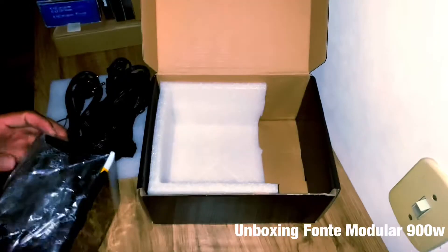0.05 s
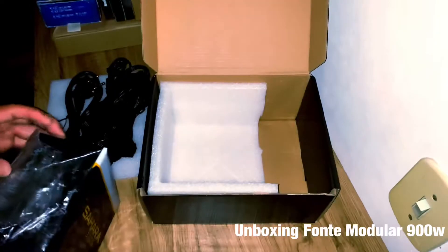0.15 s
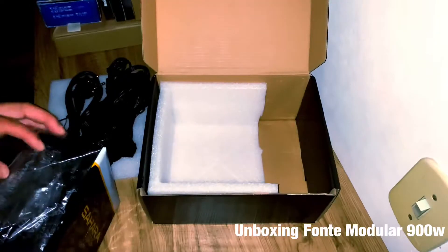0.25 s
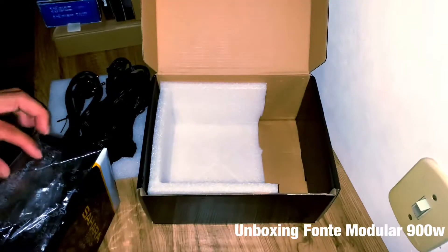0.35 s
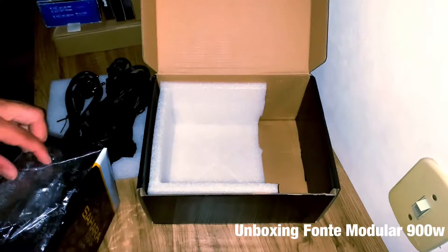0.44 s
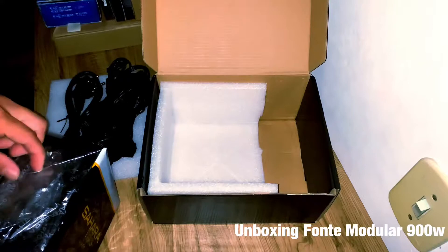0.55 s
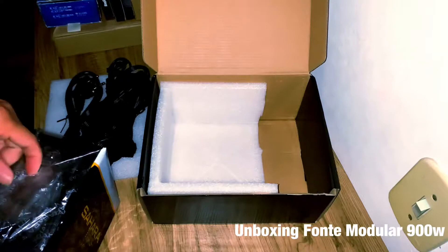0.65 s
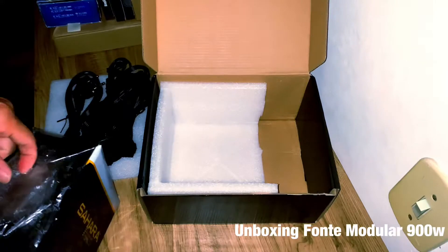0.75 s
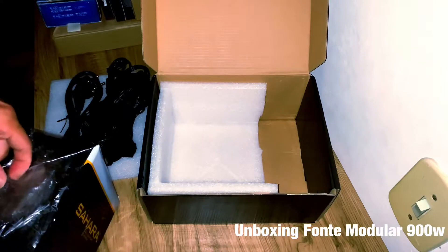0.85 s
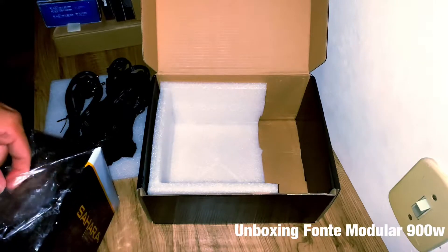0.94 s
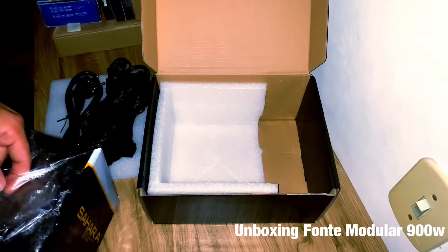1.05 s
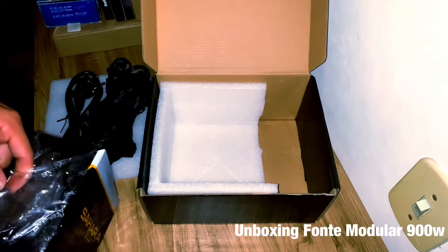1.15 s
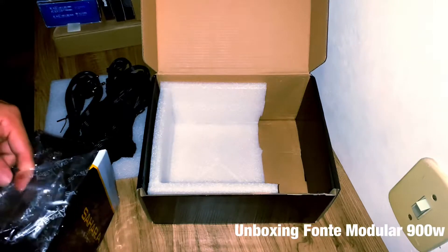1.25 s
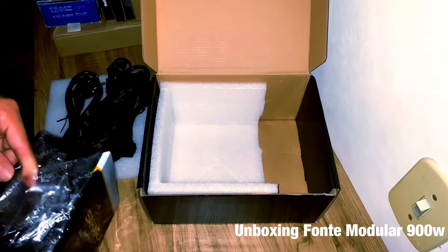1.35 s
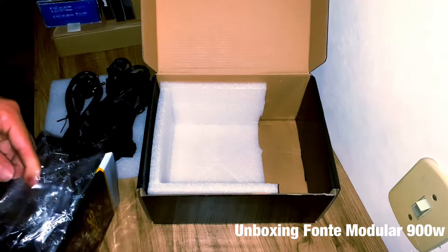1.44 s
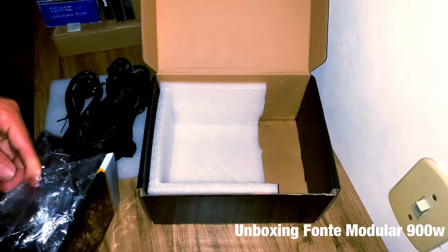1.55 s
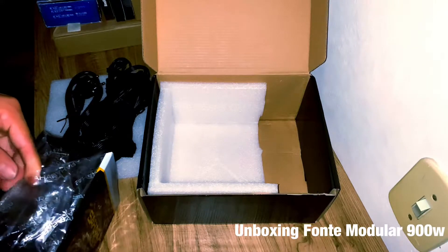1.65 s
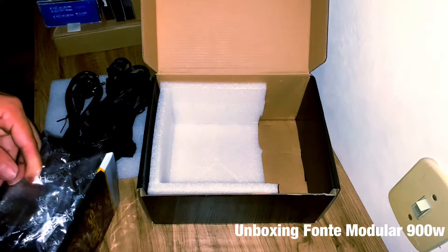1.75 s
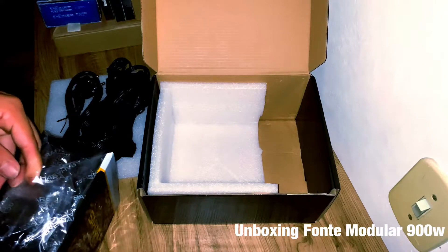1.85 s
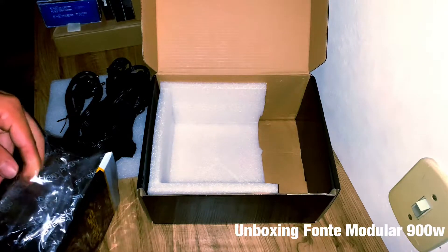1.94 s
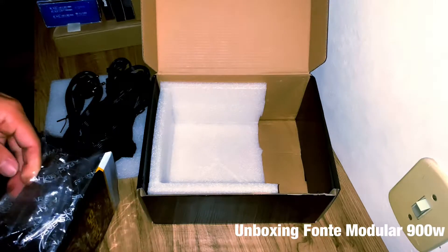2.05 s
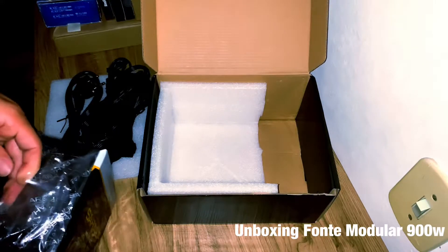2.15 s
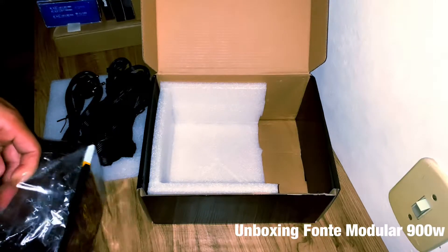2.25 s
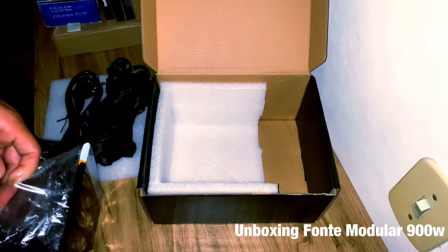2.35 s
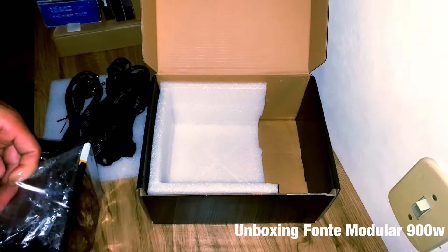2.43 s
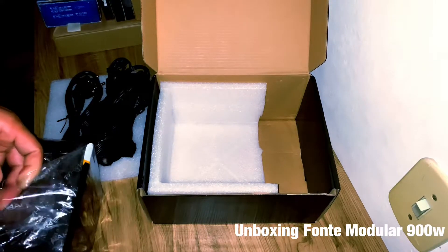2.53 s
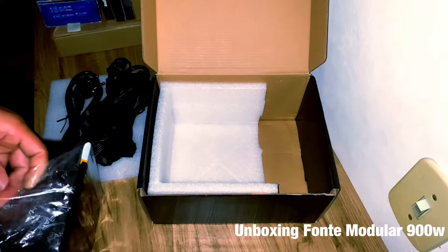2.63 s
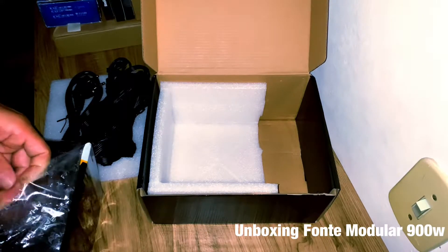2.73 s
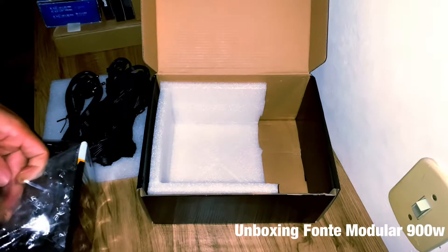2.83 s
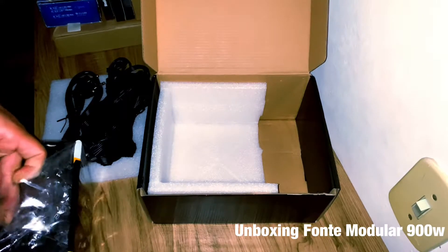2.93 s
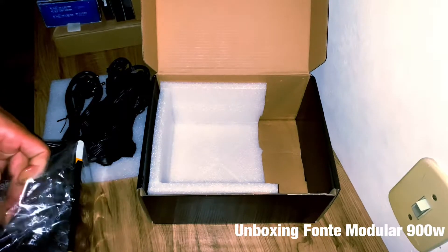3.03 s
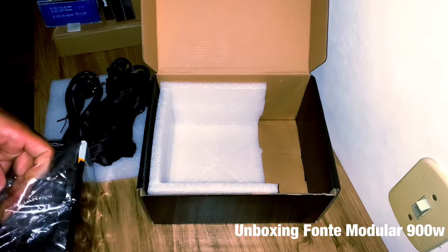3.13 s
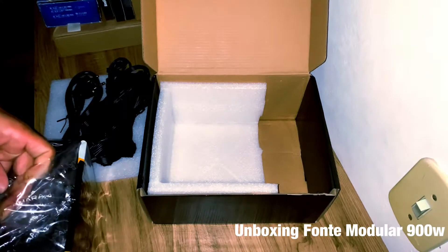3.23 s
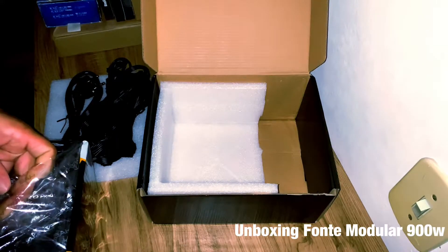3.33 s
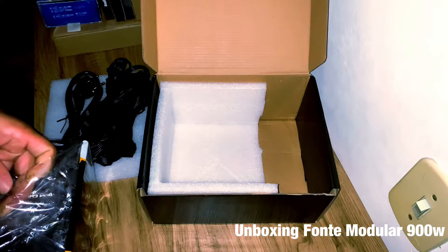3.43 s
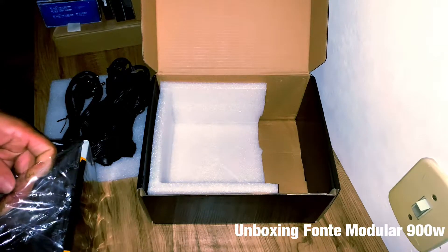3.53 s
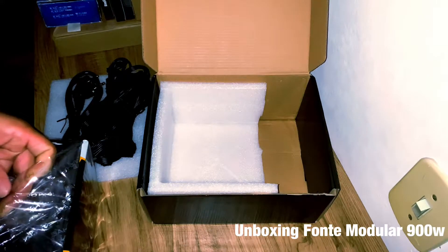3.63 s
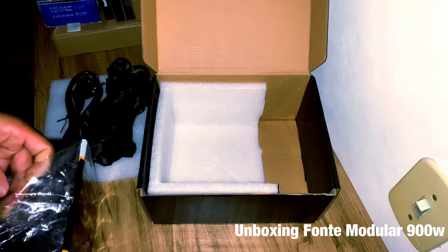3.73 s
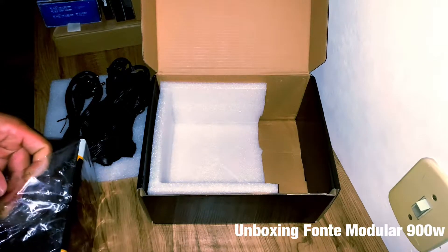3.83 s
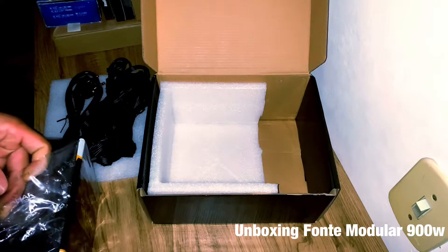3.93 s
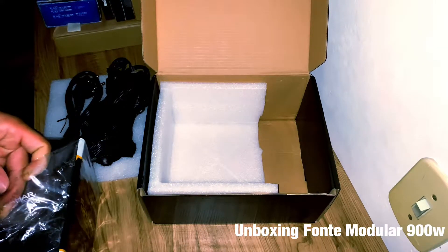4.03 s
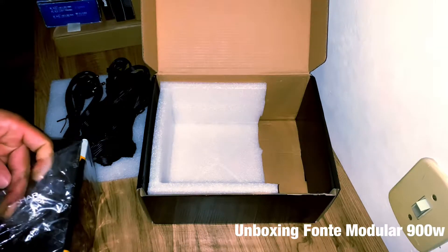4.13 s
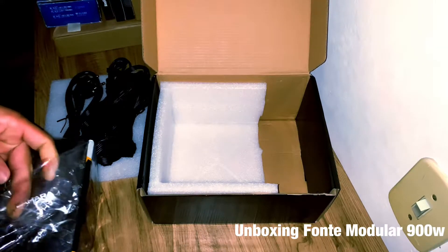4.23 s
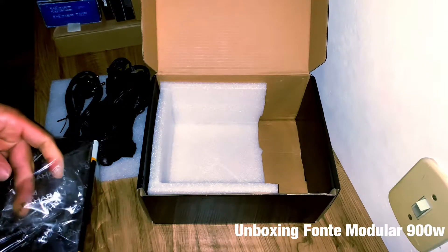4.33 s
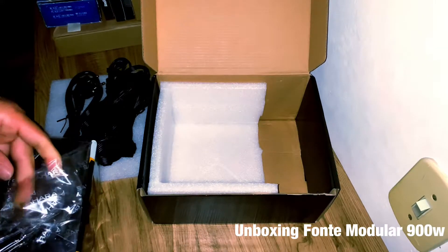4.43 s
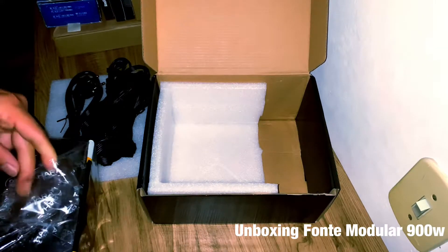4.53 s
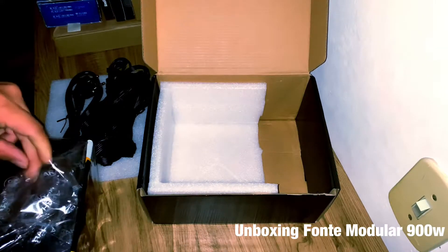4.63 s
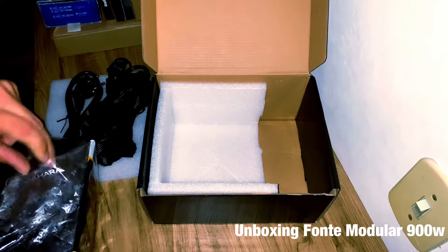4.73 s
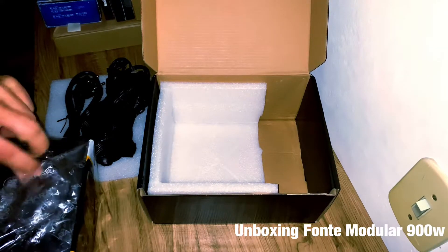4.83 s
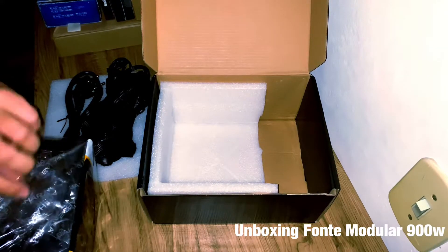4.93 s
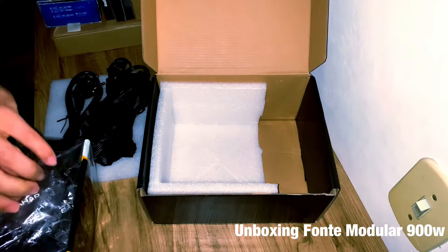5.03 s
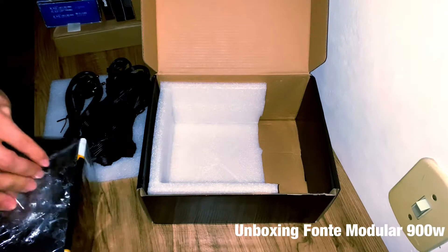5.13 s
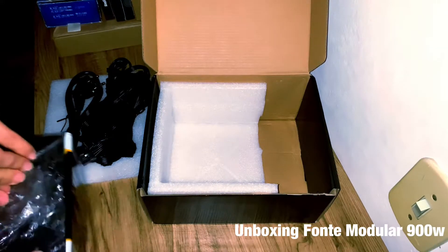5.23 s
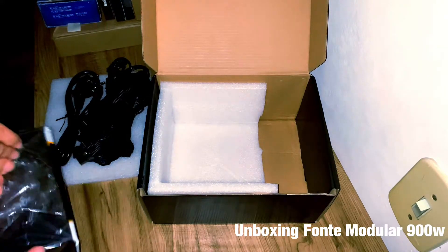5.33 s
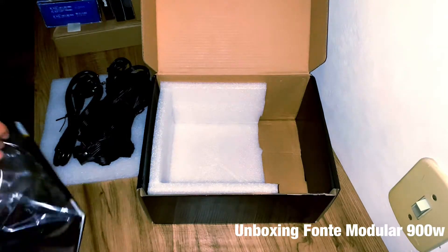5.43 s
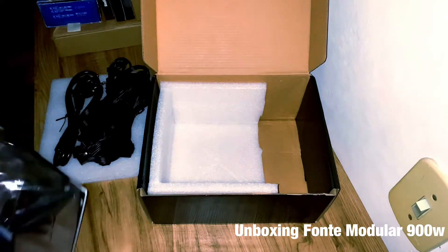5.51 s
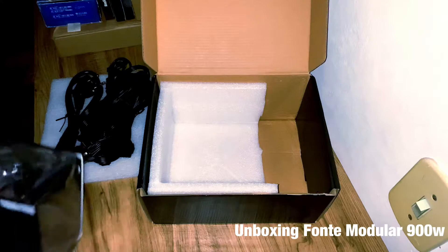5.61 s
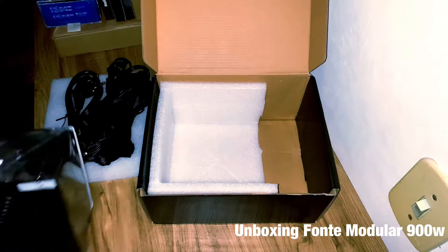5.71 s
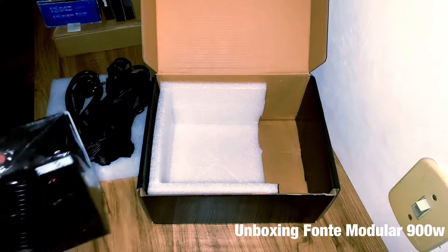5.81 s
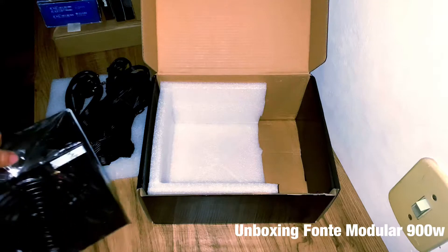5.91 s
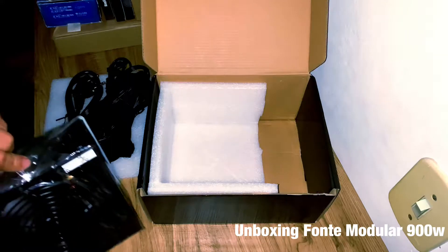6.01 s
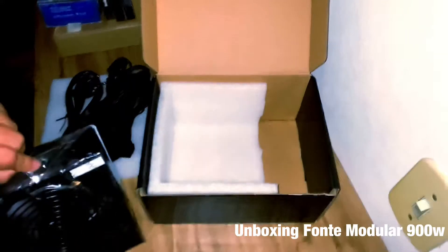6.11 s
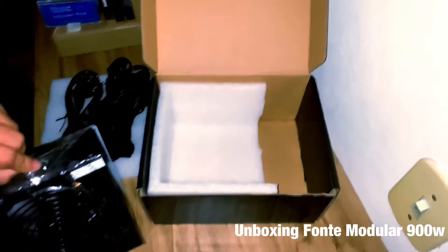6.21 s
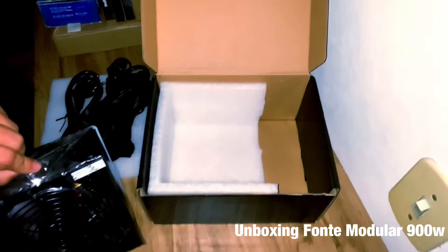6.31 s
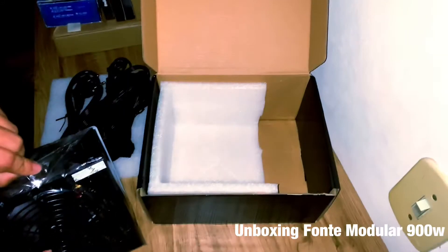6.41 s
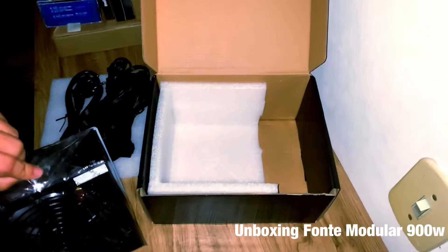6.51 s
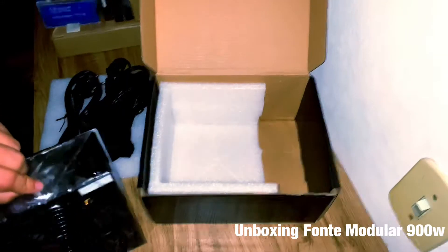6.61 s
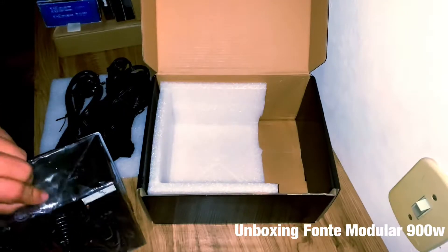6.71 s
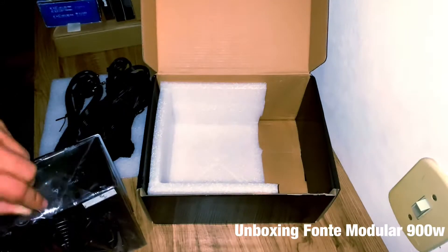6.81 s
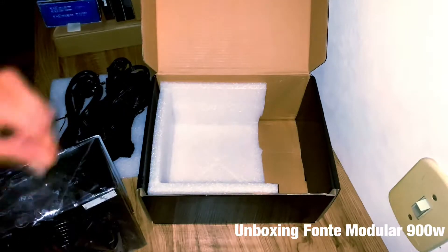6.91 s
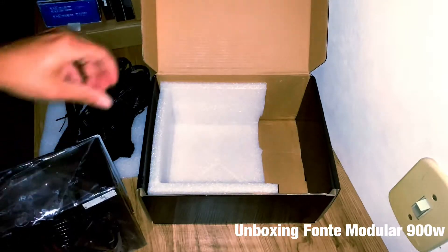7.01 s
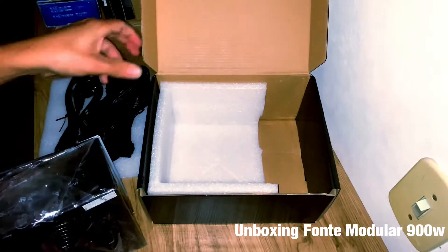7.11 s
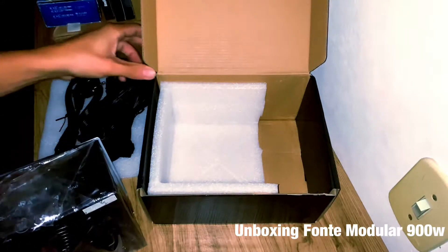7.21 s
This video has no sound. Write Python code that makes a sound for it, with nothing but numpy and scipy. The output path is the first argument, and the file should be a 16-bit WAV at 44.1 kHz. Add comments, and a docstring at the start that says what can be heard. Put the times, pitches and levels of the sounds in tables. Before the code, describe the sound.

Close, bright crinkling of thick plastic film around a heavy boxy item, soft table bumps, then a hard knock and settling boom on wood.

```python
"""Boxy item in a stiff bag, set down on wood

Small, bright room with a two-port microphone close by: a hand works a heavy item in a plastic bag, tips it up
and sets it down on a wooden table. Squeezes bring up grains of crackle and broad rustle; creases snap as clicks with
damped facet rings. Pushes raise stick-slip noise; swelling table modes boom under the nudges and the landing.
Film slides and hisses, crumples and slaps are short noise, the skids a smoother drag; the bag is heard in the room."""
import sys
import numpy as np
from scipy import signal
from scipy.fft import rfft, irfft
from scipy.io import wavfile

SR = 44100
rng = np.random.default_rng(int(sys.argv[2]) if len(sys.argv) > 2 else 0)


def dump_mix(stems):
    """Bounce the given channels to the path in sys.argv[1] as a 16-bit WAV at rate SR."""
    frames = np.atleast_2d(stems).T  # one column per channel
    limited = np.clip(frames, -1, 1)  # hard clip at full scale
    pcm = np.round(limited * 32767).astype(np.int16)
    wavfile.write(sys.argv[1], SR, pcm)


N = 320166
TIME = np.arange(N) / SR
FREQS = np.fft.rfftfreq(N, 1 / SR)
TOP_HZ = 16200

# Event levels are relative, before any trims in the functions; each spectrum is scaled to unit mean power.
# fingers squeezing the bag: start_s, length_s, crackle_db, folds_db
SQUEEZES = [(-.02, 0.083, -42, -45), (.32, .04, -46.5, -60.5), (.44, 0.082, -39.5, -47.5),
            (.64, 0.35, -45.5, -47.5), (1.02, 0.031, -41, -42), (1.16, 0.05, -55, -47),
            (1.34, 0.14, -44, -45.5), (1.5, 0.097, -53.5, -53.5), (1.62, 0.073, -65, -45.5),
            (1.82, .05, -40.5, -44.5), (2.05, 0.057, -52.5, -40.5), (2.2, 0.088, -44, -44),
            (2.46, 0.078, -42, -49.5), (2.6, 0.21, -58, -46), (2.8, 0.063, -42, -51),
            (2.95, .15, -42.5, -46.5), (3.3, 0.1, -60, -52), (3.49, 0.21, -49.5, -48),
            (4.04, .17, -49, -52), (4.28, 0.33, -54, -54), (4.58, 0.038, -43, -40.5),
            (4.85, 0.23, -49, -46.5), (5.16, 0.13, -49, -44.5), (5.35, 0.53, -86, -57),
            (5.99, 0.04, -59, -46.5), (6.53, 0.14, -41, -40.5), (6.71, 0.1, -45, -45.5),
            (7.11, 0.27, -50.5, -58.5)]
SQUEEZE_ATTACK_S, SQUEEZE_RELEASE_S = 0.014, 0.057
HELD_CRACKLE_DB, HELD_FOLDS_DB = -87, -59  # the film is never quite still in the hand
# spectra of the tiny wrinkles and of the broad folds: pitch_hz, level_db
CRACKLE_SPECTRUM = [(1500, -21), (3000, -2), (5000, -1.5), (10500, 1), (14000, -3.5), (16500, -20)]
FOLDS_SPECTRUM = [(450, -4), (800, -9), (1200, 2.5), (1450, -2.5), (1850, 1), (2600, -4), (3600, -4.5),
                  (6000, -28)]
# the hand glides over smooth film: peak_s, half_length_s, level_db
GLIDES = [(.06, 0.12, -40), (1.05, 0.015, -42), (3.36, 0.013, -40), (5.235, 0.049, -40),
          (5.34, 0.034, -56.5), (5.72, .04, -48), (6.30, 0.024, -63), (6.62, 0.062, -40)]
# spectrum of the gliding hand: pitch_hz, level_db
GLIDE_SPECTRUM = [(1000, -6), (2500, -3), (6000, -2.5), (10000, -1.5), (13000, -0.5), (15000, -4.5),
                  (16500, -20)]
# taut film sliding over the item: peak_s, half_length_s, level_db
SLIDES = [(3.397, .035, -49), (5.534, 0.059, -58.5), (5.617, 0.044, -62), (5.738, 0.065, -59.5),
          (5.963, 0.05, -58), (6.506, 0.078, -56), (6.60, 0.062, -46)]
# spectrum of the sliding film: pitch_hz, level_db
SLIDE_SPECTRUM = [(900, -19), (1700, -6), (2000, -3), (2200, 6.5), (2450, -5), (3300, -4), (4300, -16),
                  (9000, -13), (15000, -47)]
# the item pushed over the table: start_s, length_s, rumble_db, scrape_db
PUSHES = [(-.02, 0.15, -46, -48), (.46, 0.084, -74, -49.5), (.72, 0.21, -49, -47.5),
          (1.02, .38, -51, -48.5), (1.62, 0.1, -50, -54), (2.06, .23, -47, -47), (2.48, 0.13, -56, -52.5),
          (2.72, .35, -42.5, -49.5), (3.32, 0.3, -48, -48), (4.4, 0.26, -52, -53.5),
          (4.97, 0.23, -45, -47.5), (5.42, 0.27, -44, -52.5), (6, 0.38, -33.5, -46.5),
          (6.48, 0.17, -39, -41.5), (6.7, 0.17, -50.5, -50), (7.15, .11, -51, -61)]
PUSH_ATTACK_S, PUSH_RELEASE_S = 0.026, 0.089
HELD_RUMBLE_DB, HELD_SCRAPE_DB = -59, -59
# spectra of the low and middle rubbing on wood: pitch_hz, level_db
RUMBLE_SPECTRUM = [(20, -36), (45, -9), (72, -0.5), (100, -7), (150, 1), (200, -4), (260, -16.5),
                   (500, -62)]
SCRAPE_SPECTRUM = [(170, -15.5), (240, -8), (320, 8), (380, -5), (450, 8), (530, 0), (630, -2.5),
                   (800, 1.5), (1300, -48.5)]
# the item's edge skids over the wood: peak_s, half_length_s, level_db
SKIDS = [(6.295, 0.058, -38.5), (6.615, 0.07, -46.5)]
# spectrum of the skidding edge: pitch_hz, level_db
SKID_SPECTRUM = [(250, -18), (330, 12), (380, -3), (440, 11.5), (520, -13), (630, -1), (710, 7.5),
                 (800, -13), (930, -11), (1130, -7.5), (1500, -15.5), (3000, -24), (9000, -42),
                 (15000, -50)]
# big creases snapping: snap_s, tick_db (treble), crack_db, facet_db (ringing film), facet_hz
BIG_SNAPS = [(0.0577, -41, -38, -59, 2480), (0.0748, -33.5, -38, -45.5, 2310),
             (0.1578, -39.5, -42, -54, 790), (.4056, -47, -40.5, -45, 1310), (0.4605, -37, -39, -50, 1890),
             (.5346, -38.5, -37, -48.5, 1230), (0.566, -39.5, -40.5, -50, 1840),
             (.6323, -33.5, -34, -49.5, 1880), (0.659, -46, -43, -45, 1400),
             (.7656, -28, -36.5, -38.5, 1080), (0.809, -41, -35, -56, 820), (.8343, -29.5, -41, -48, 2320),
             (.858, -34, -38, -49, 1930), (0.8836, -35, -38, -41.5, 1940),
             (0.9109, -26, -37.5, -41.5, 1170), (0.9505, -30.5, -32.5, -43, 2440),
             (1.1366, -40.5, -37.5, -54, 830), (1.198, -35, -40.5, -47, 1820),
             (1.29, -41, -42, -50.5, 1760), (1.3196, -37, -49, -45.5, 1750),
             (1.3525, -30.5, -37.5, -47, 890), (1.381, -34, -39.5, -48, 2330),
             (1.405, -36.5, -41.5, -54, 1850), (1.5229, -40, -45, -50, 2020),
             (1.6261, -38.5, -35.5, -41.5, 2030), (1.6729, -45, -41, -44, 2070),
             (1.8296, -25, -25, -28, 2000), (1.8335, -36, -36, -31, 1900), (1.978, -40, -43.5, -40, 1770),
             (2.065, -41, -42.5, -33, 2360), (2.1628, -38, -39, -47, 1160),
             (2.178, -36, -39.5, -31.5, 2320), (2.2211, -39.5, -50, -39, 1800),
             (2.2467, -39, -41, -40, 1900), (2.3807, -41, -46.5, -49, 1780),
             (2.436, -41, -39.5, -38.5, 1850), (2.4803, -33, -42, -49, 1800),
             (2.488, -34, -39.5, -37.5, 2110), (2.6225, -29, -35.5, -41.5, 2050),
             (2.6627, -40.5, -41, -46, 2530), (2.7094, -37.5, -50, -49, 1160),
             (2.7447, -33, -46, -44, 1860), (2.8192, -33.5, -37, -43, 830),
             (2.8792, -38.5, -40, -47.5, 2390), (2.9324, -35, -44, -43.5, 1980),
             (2.9527, -34.5, -45, -37, 1860), (2.973, -33.5, -34, -40, 2250), (2.9874, -37, -34, -38, 2080),
             (3.057, -38, -50, -47.5, 1820), (3.0891, -38.5, -39.5, -42, 2040),
             (3.1174, -42, -47, -63, 1850), (3.2711, -42, -47.5, -45.5, 2470),
             (3.39, -41, -41.5, -29, 2360), (3.553, -39.5, -47, -62, 2430), (3.6023, -40.5, -48, -46, 1880),
             (3.6197, -41.5, -41, -42, 1800), (3.7072, -40, -39.5, -51.5, 1180),
             (3.7594, -53, -56, -42.5, 2300), (3.9955, -57, -60, -66, 1900), (4.053, -50, -52.5, -46, 1840),
             (4.148, -39, -39, -56, 2580), (4.2086, -49, -47, -47, 1810), (4.2839, -35, -38.5, -49, 1890),
             (4.42, -43.5, -47.5, -43, 1870), (4.5769, -28.5, -33, -37.5, 2550),
             (4.6134, -33, -36, -41, 2480), (4.6242, -30.5, -40, -40, 1800), (4.641, -34, -36.5, -41, 1890),
             (4.909, -39.5, -43, -48, 1140), (4.9476, -31, -38.5, -45, 1880), (4.993, -29, -40, -36, 1730),
             (5.0203, -29.5, -29, -36, 1900), (5.0729, -32, -46, -46, 1850), (5.088, -34, -40, -50, 1890),
             (5.1213, -35, -36, -38.5, 1860), (5.13, -28, -34.5, -37, 1850),
             (5.6362, -32, -42.5, -44.5, 1880), (5.672, -38, -44, -57, 2240), (5.784, -31, -39, -44.5, 820),
             (6.421, -69, -53, -47.5, 1870), (6.575, -40, -34, -39, 2100), (6.6556, -28.5, -28, -37, 2520),
             (6.732, -36.5, -45, -46, 1950), (6.784, -46.5, -40.5, -50, 2000),
             (6.9927, -56, -48.5, -45.5, 766), (7.1118, -50.5, -44.5, -49.5, 1900),
             (7.1593, -43.5, -43.5, -59, 1890)]
# spectra of the treble tick and of the crack: pitch_hz, level_db
TICK_SPECTRUM = [(4500, -19.5), (7200, -2), (10500, -1), (14000, -0.5), (15500, -5.5), (17000, -31)]
CRACK_SPECTRUM = [(1200, -22), (2700, -7.5), (4200, -3.5), (6500, -5), (9500, -25)]
# soft nudges of the padded item on the table: start_s, swell_s, boom_db, knock_db
NUDGES = [(.155, .012, -44, -46), (1.244, .014, -44, -40), (2.124, 0.0093, -32.5, -34.5),
          (2.198, 0.017, -34.5, -42), (2.243, .019, -33.5, -64), (2.738, 0.018, -30, -37.5),
          (2.785, 0.037, -30, -44.5), (3.007, 0.027, -29, -48.5), (5.508, .014, -31, -48),
          (6.276, 0.012, -28.5, -49), (6.304, 0.03, -24.5, -58), (6.501, 0.037, -45, -32.5),
          (6.556, 0.015, -20, -28), (6.582, 0.016, -40, -27.5)]
NUDGE_SECOND_DB, NUDGE_CLACK_DB = -12, -10  # second mode against the mean of boom and knock; clack against knock
# the item lands edge first, falls flat and settles: start_s, swell_s, boom_db, second_db, knock_db, clack_db
LANDING = [(5.995, 0.0025, -51, -40, -39, -7), (5.9984, 0.0077, -35, -7, -15.5, -28),
           (6.0035, 0.0053, -39, -19, -2.5, -40), (6.014, 0.013, -21, -26.5, -25, -38),
           (6.042, .011, -13, -33, -13.5, -49), (6.06, 0.019, -19.5, -41, -44, -52)]
# table and item modes: nominal pitch_hz, driving level (rounded: 0 boom, 1 second, 2 knock, 3 clack), level_db
TABLE_MODES = [(146.1, 0.5, 0.5), (105, 1, -10), (318, 1, -1), (278, 1.5, -13.5), (504.8, 2, 1.5),
               (444.6, 2, -5.5), (569, 2, -11.5), (852, 3, -10.5), (1015, 3, -14.5), (1140, 3, -14)]
# fingers crumple a fold against the item: start_s, level_db
CRUMPLES = [(.532, -37), (.767, -45), (.911, -34.5), (1.263, -40.5), (1.353, -33.5), (1.977, -44.5),
            (2.062, -32.5), (2.822, -37.5), (2.952, -39), (3.328, -34), (3.471, -36), (3.6, -38),
            (3.756, -39.5), (4.64, -42), (4.991, -36.5), (5.089, -35), (5.714, -42.5), (5.783, -35.5)]
CRUMPLE_DECAY_S = 0.01
# spectrum of a crumpled fold: pitch_hz, level_db
CRUMPLE_SPECTRUM = [(200, -25), (350, -3), (500, 5), (650, -4.5), (820, -3), (1200, -4.5), (1500, -5.5),
                    (2200, -8), (4000, -20)]
# the wrapped item slaps the wood: start_s, level_db, decay_s
SLAPS = [(5.9965, -22, 0.0029), (6.0005, -23.5, 0.011)]
# spectrum of a slap: pitch_hz, level_db
SLAP_SPECTRUM = [(500, -26), (850, 2.5), (1200, 5), (1600, -4), (2600, -5), (4000, -12.5), (8000, -17),
                 (13000, -19), (16000, -27)]
# spectra of the room's tail and of its quiet air: pitch_hz, level_db
ROOM_SPECTRUM = [(100, 3.5), (600, 4), (2000, 1), (5000, 4), (10000, 0.5), (16000, -4)]
AIR_SPECTRUM = [(25, -11), (55, 10), (150, -4.5), (500, -8), (2000, -24), (6000, -19), (12000, -39),
                (16000, -52.5)]


def undb(db):
    """Amplitude ratio of a level in dB."""
    return 10 ** (np.asarray(db) / 20)


def unit(x):
    """Scale to an rms of 1."""
    return x / np.sqrt(np.mean(x ** 2) + 1e-20)


def add(track, s, sound):
    """Mix a sound into a track from time s on."""
    i = max(int(s * SR), 0)
    part = track[..., i:i + sound.shape[-1]]
    part += sound[..., :part.shape[-1]]


def colour(x, points):
    """Causal minimum-phase filter of a given spectrum; white noise keeps its power."""
    hz, db = np.transpose(points)
    gain = unit(undb(np.interp(np.log(FREQS + 1), np.log(hz), db)))
    cepstrum = irfft(np.log(gain), N)[:4096]
    cepstrum[1:] *= 2  # folding the cepstrum makes the filter causal
    response = irfft(np.exp(rfft(cepstrum)))
    return signal.oaconvolve(x, response[None], axes=-1)[:, :N]


def ports(length, alike):
    """Noise at the two microphone ports, sharing a given part of its power."""
    a = np.clip(alike, 0, 1)
    shared = np.sqrt(a) * rng.standard_normal(length)
    return shared + np.sqrt(1 - a) * rng.standard_normal((2, length))


def curves(table, attack_s, release_s, rest_db):
    """Hand moves rise, hold and die away over a resting level: dB per sample for each level column."""
    power = undb(2 * np.array(rest_db))[:, None] * np.ones(N)
    for s, length_s, *levels in table:
        t = np.arange(int((length_s + 8 * release_s) * SR)) / SR
        shape = np.minimum(t / attack_s, 1) * np.exp(-np.maximum(t - length_s, 0) / release_s)
        add(power, s, (undb(levels)[:, None] * shape) ** 2)
    return 10 * np.log10(power)


def swells(table):
    """Amplitude of a few smooth strokes, each bell-shaped in time."""
    return sum(undb(db) * np.exp(-((TIME - s) / half_s) ** 2) for s, half_s, db in table)


def grains(rate, scatter_db, grain_s, bed, alike):
    """Many small slips (rate per second) of uneven size over a smooth hiss; rms 1."""
    sizes = undb(scatter_db * np.minimum(rng.exponential(size=N), 2.5))
    power = (rng.random(N) < rate / SR) * sizes ** 2
    power = signal.lfilter([1], [1, -np.exp(-2 / (grain_s * SR))], power)  # each slip dies away
    return unit(np.sqrt(power / power.mean() + abs(bed)) * ports(N, alike))


def squeezing():
    """Level in dB, before trims, of the crackle and of the folds under the fingers."""
    return curves(SQUEEZES, SQUEEZE_ATTACK_S, SQUEEZE_RELEASE_S, [HELD_CRACKLE_DB, HELD_FOLDS_DB])


def rustle(crackle_db=-7.0, folds_db=-6, slide_db=1, glide_db=-1):
    """Tiny wrinkles crackle, broad folds rustle, taut film slides and hisses while the hand moves."""
    fine, broad = squeezing()
    crackle = colour(grains(rate=200, scatter_db=2.0, grain_s=0.00095, bed=0.061, alike=0.77), CRACKLE_SPECTRUM)
    folds = colour(grains(rate=150, scatter_db=6, grain_s=0.0036, bed=0.1, alike=0.25), FOLDS_SPECTRUM)
    slide = colour(grains(rate=1100, scatter_db=2.0, grain_s=0.0011, bed=0.92, alike=0.24), SLIDE_SPECTRUM)
    glide = colour(grains(rate=1300, scatter_db=-4, grain_s=0.00092, bed=0.68, alike=0.49), GLIDE_SPECTRUM)
    squeezed = crackle * undb(fine + crackle_db) + folds * undb(broad + folds_db)
    sliding = slide * swells(SLIDES) * undb(slide_db)
    gliding = glide * swells(GLIDES) * undb(glide_db)
    return squeezed + sliding + gliding


def rubbing(rumble_db=-3, scrape_db=-3):
    """The item sticks and slips on the wood: rumble and scrape under the pushes, smoother skids of its edge."""
    low, mid = curves(PUSHES, PUSH_ATTACK_S, PUSH_RELEASE_S, [HELD_RUMBLE_DB, HELD_SCRAPE_DB])
    rumble = colour(grains(rate=110, scatter_db=2.5, grain_s=0.0019, bed=.8, alike=0.99), RUMBLE_SPECTRUM)
    scrape = colour(grains(rate=70, scatter_db=3.5, grain_s=0.0044, bed=0.45, alike=0.31), SCRAPE_SPECTRUM)
    skid = colour(grains(rate=520, scatter_db=2, grain_s=0.0018, bed=1, alike=0.25), SKID_SPECTRUM)
    pushed = rumble * undb(low + rumble_db) + scrape * undb(mid + scrape_db)
    return pushed + skid * swells(SKIDS)


def small_snaps(count, usual_db=-47, slack_db=-52, scatter_db=1.5, facet_hz=1900):
    """Lesser creases give way at random moments, louder the firmer the squeeze."""
    effort_db = 20 * np.log10(np.hypot(*undb(squeezing())))
    rows = []
    for k in range(count):
        i = int(N * (k + rng.random()) / count)  # one in each equal stretch of time
        levels = np.array([-48, -49, -53]) + effort_db[i] - usual_db  # tick, crack, facet
        levels = levels + scatter_db * rng.standard_normal(3)
        slack = min(effort_db[i] - slack_db, 0)  # slack film hardly snaps at all
        rows.append((i / SR, *(levels + slack), facet_hz * np.exp(0.18 * rng.standard_normal())))
    return rows


def buckle(t, snap_s, bounce_s, bounce_db, shiver_db, shiver_s):
    """Envelope of a crease: the snap, its bounce off the table, the shiver of the sheet; rms 1 over 5 ms."""
    late = np.maximum(t - bounce_s, 0)
    power = np.exp(-2 * t / snap_s)
    power = power + undb(2 * bounce_db) * (late > 0) * np.exp(-2 * late / snap_s)
    power = power + undb(2 * shiver_db) * np.exp(-2 * t / shiver_s)
    return np.sqrt(power / power[:SR // 200].mean())


def pleat(x, hz, share):
    """The pleat next to a crease stresses one pitch in its click; rms 1."""
    return unit(x + share * signal.lfilter(*signal.iirpeak(hz, 3, fs=SR), x))


def snaps(tick_db=2.0, crack_db=2, facet_db=3, facet_s=0.0017, creep_db=-18, creep_s=0.0021):
    """Each crease creeps, flips with a wide click, and rings the facets next to it."""
    ticks, cracks, facets = np.zeros((3, 2, N))
    t = np.arange(SR // 30) / SR
    for s, tick, crack, facet, hz in [*BIG_SNAPS, *small_snaps(count=90)]:
        flip = buckle(t, snap_s=0.00041, bounce_s=rng.uniform(0.00068, 0.0019), bounce_db=-6.5,
                      shiver_db=-18, shiver_s=0.0041)
        creep = flip[0] * undb(creep_db) * np.exp(-t[::-1] / creep_s)
        shape = np.r_[creep, flip]
        size = np.sqrt(np.mean(shape ** 2))  # gives back the level that pleat() evens out
        start = s - t[-1] - .0002
        click = pleat(shape * ports(len(shape), 0.77), rng.uniform(8700, 13100), share=0.42)
        add(ticks, start, size * undb(tick + tick_db) * click)
        click = pleat(shape * ports(len(shape), 0.087), rng.uniform(2420, 7140), share=1.34)
        add(cracks, start, size * undb(crack + crack_db) * click / np.sqrt(2))
        # three neighbouring facets, heavily damped, reach the two ports out of step
        for ratio, share in [(1, 1), (rng.uniform(0.49, 0.968), .45), (rng.uniform(1.098, 1.45), .45)]:
            turn = rng.uniform(0, 2 * np.pi) + np.array([[1.3], [0]])
            swell = np.exp(-t / facet_s) * (1 - np.exp(-t / 0.00041))
            ring = swell * np.sin(2 * np.pi * hz * ratio * t + turn)
            add(facets, s - .0005, 4 * share * undb(facet + facet_db) * ring)
    lean = undb(np.array([[.5], [-.5]]))  # cracks are slightly louder at the first port
    return colour(ticks, TICK_SPECTRUM) + colour(cracks, CRACK_SPECTRUM) * lean + facets


def blows(steep=2.08, turn=1.3, ring_db=-31, ring_s=0.024):
    """The padded item pushes on the table: each mode swells and is damped again by the load."""
    out = np.zeros((2, N))
    t = np.arange(SR // 4) / SR
    nudges = [(s, swell_s, boom, (boom + knock) / 2 + NUDGE_SECOND_DB, knock, knock + NUDGE_CLACK_DB)
              for s, swell_s, boom, knock in NUDGES]
    for s, swell_s, *levels in [*LANDING, *nudges]:
        u = t / swell_s
        swell = (u * np.exp(1 - u)) ** steep
        shape = swell + undb(ring_db) * np.minimum(u, 1) * np.exp(-t / ring_s)
        for hz, group, db in TABLE_MODES:
            detune = 1 + 0.022 * rng.standard_normal()  # the load shifts the modes
            lead = np.array([[turn], [0]]) * min(hz / 450, 1) ** 2  # long waves reach both ports together
            tone = np.sin(2 * np.pi * hz * detune * t + lead)
            add(out, s, undb(levels[int(round(group))] + db) * shape * tone)
    return out


def bursts(table, spectrum, alike):
    """Short, rough impacts that die away at once."""
    out = np.zeros((2, N))
    t = np.arange(SR // 10) / SR
    for s, db, decay_s in table:
        shape = np.exp(-t / decay_s) * (1 - np.exp(-t / 0.00045))
        add(out, s, undb(db) * shape * ports(len(t), alike))
    return colour(out, spectrum)


def crumples():
    """Fingers crumple a fold against the item: short bursts of noise with one decay."""
    return bursts([(s, db, CRUMPLE_DECAY_S) for s, db in CRUMPLES], CRUMPLE_SPECTRUM, alike=0.25)


def slaps():
    """The wrapped item slaps the wood: bursts of noise, each with its own decay."""
    return bursts(SLAPS, SLAP_SPECTRUM, alike=0.53)


def room(x, wet_db, t60, onset_s):
    """Close walls return a dense, short tail, different at each port."""
    t = np.arange(SR // 2) / SR
    tail = ports(len(t), .3) * undb(-60 * t / t60) * (1 - np.exp(-t / onset_s))
    tail /= np.sqrt(np.sum(tail ** 2, axis=1, keepdims=True))
    return undb(wet_db) * colour(signal.fftconvolve(x, tail, axes=1)[:, :N], ROOM_SPECTRUM)


def room_air():
    """Quiet steady noise of the room, the same at both ports."""
    return undb(-66.5) * colour(ports(N, 1.0), AIR_SPECTRUM)


def scene():
    """The film, bright in the room; the table, nearly dry; the rubbing, dry; quiet room air."""
    bag = rustle() + snaps() + crumples() + slaps()
    table = blows()
    bag_tail = room(bag, wet_db=-6.0, t60=0.26, onset_s=0.00075)
    table_tail = room(table, wet_db=-30, t60=0.26, onset_s=.008)
    return bag + bag_tail + table + table_tail + rubbing() + room_air()


def record(dry):
    """The recorder clips at full scale, then cuts the top."""
    top_cut = signal.ellip(8, .2, 70, TOP_HZ, fs=SR, output="sos")
    return signal.sosfilt(top_cut, np.clip(dry, -1, 1))


dry = scene()
out = record(dry)
dump_mix(out)
```